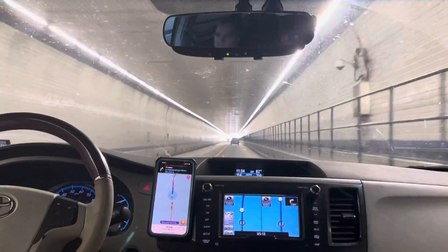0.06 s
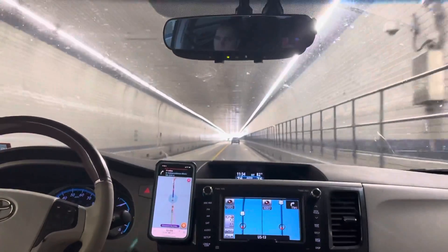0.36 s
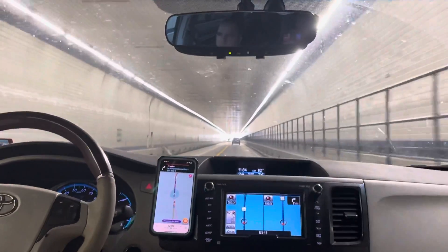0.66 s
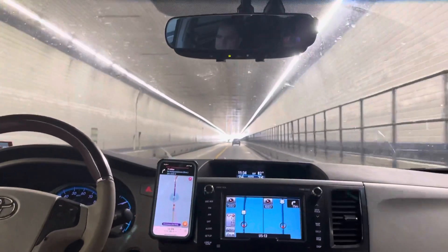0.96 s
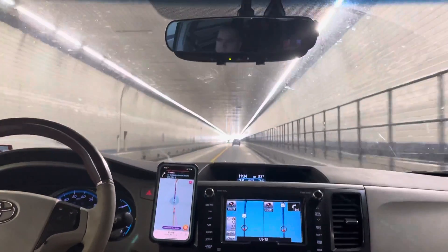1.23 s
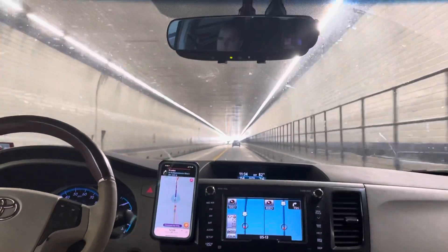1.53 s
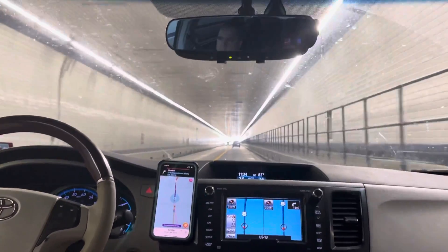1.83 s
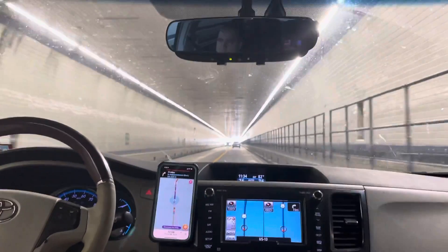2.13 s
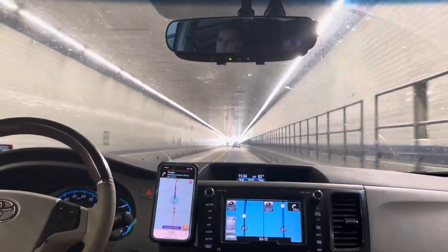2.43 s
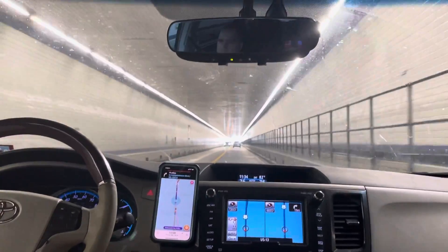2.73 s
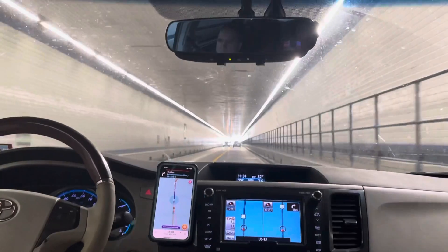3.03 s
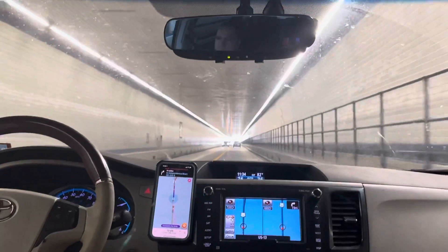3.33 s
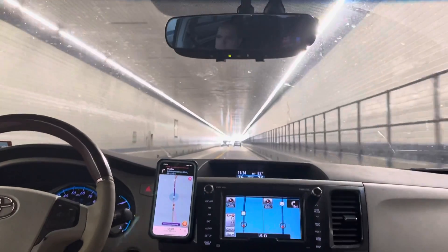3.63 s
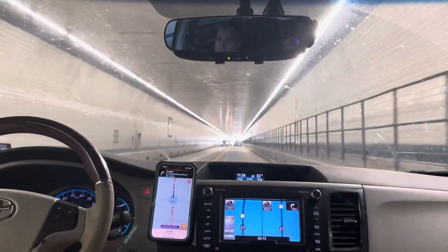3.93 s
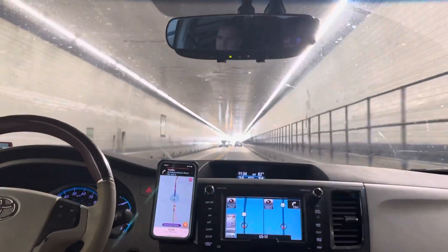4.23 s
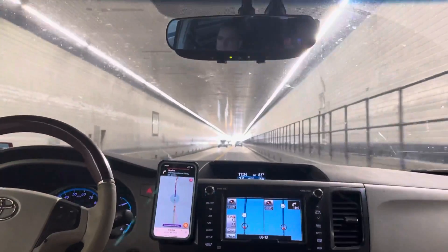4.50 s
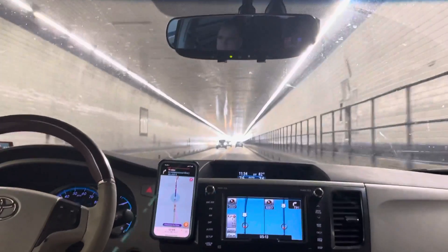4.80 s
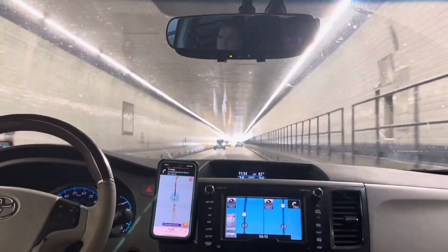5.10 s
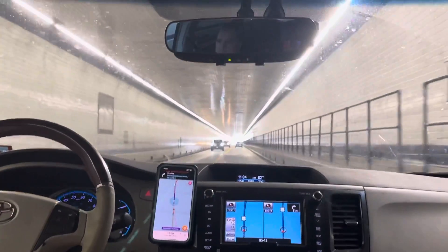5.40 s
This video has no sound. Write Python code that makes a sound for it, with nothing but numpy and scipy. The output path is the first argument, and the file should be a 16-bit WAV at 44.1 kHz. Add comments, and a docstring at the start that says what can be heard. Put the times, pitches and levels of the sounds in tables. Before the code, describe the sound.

A car cruises through a long tunnel, heard from the front seats with the windows shut. A deep, steady road rumble and a low engine drone fill the whole five and a half seconds, the pitch creeping up very slightly. Muffled tyre roar lies above them, with a faint, thin whine in the hiss. A small knock hits the microphone's holder right at the start. From about 1 second a deep cabin boom builds, reaching full strength near 2.4 seconds and holding. The rumble surges briefly several times between 1 and 1.8 seconds, and again around 4.3 and 4.7 seconds. Plastic trim gives light, short ticks at about 2.6, 3.7 and 4.9 seconds. A second, duller knock on the holder comes at about 5.3 seconds, while the rumble carries on to the end.

```python
"""Car cruising through a tunnel

Heard from inside, gathering speed very slightly. The road shakes the body into a deep rumble, the six-cylinder
engine drones, and its deepest tone swells into a boom. Tyre roar, thrown back by the tunnel walls, comes in
through the glass. A thin whine rings in the road hiss and the treble swells faintly at times. Plastic trim
ticks now and then, and two small knocks land on the microphone's holder."""
import sys
import numpy as np
from scipy import signal
from scipy.fft import rfft, irfft
from scipy.io import wavfile

SR = 44100
rng = np.random.default_rng(int(sys.argv[2]) if len(sys.argv) > 2 else 0)


def file_out(sig):
    """Save sig as 16-bit WAV at sys.argv[1]."""
    # one column per channel
    cols = np.atleast_2d(sig).T
    # limit, then scale
    lim = np.clip(cols, -1, 1)
    pcm = np.round(lim * 32767).astype(np.int16)
    wavfile.write(sys.argv[1], SR, pcm)


N = 249606


# The low bed of road noise: freq_hz, density_db
RUMBLE_SPECTRUM = [(14, -67), (26, -58.5), (34, -57), (44, -40), (64, -45), (88, -42.3), (115, -43.7),
                   (140, -47.7), (160, -51), (192, -57.5), (245, -54), (315, -62.5), (420, -61.8),
                   (600, -82)]
def road_rumble(gain_db):
    """The road shakes the car's body into a steady, deep rumble."""
    return from_db(gain_db) * cabin_noise(RUMBLE_SPECTRUM)


# The boom's slow glide and build: time_s, pitch_hz, level_db
BOOM_CURVE = [(0, 54.5, -29), (.85, 55.2, -35), (1.15, 55.5, -26), (2, 56.4, -24), (2.4, 56.8, -22.3),
              (3.6, 57.7, -22.5), (4.5, 57.8, -23.5), (5.6, 58, -24.3)]
def engine_boom(gain_db, waver):
    """A firm, deep engine tone near four times the cycle rate; it builds with speed."""
    hz, db = in_time(BOOM_CURVE)
    tone = (1 + waver * drift(6.6)) * np.cos(2 * np.pi * np.cumsum(hz) / SR)
    return np.sqrt(2) * from_db(db + gain_db) * tone * port_gains(hz.mean())


# Engine tones at their fullest, the 6th being the firing rate: cycle_multiple, level_db
ENGINE_HARMONICS = [(6, -28.8), (8, -38), (9, -37.5), (12, -31), (15, -32.5), (18, -38.5), (19, -51),
                    (20, -48), (21, -52), (24, -50.5), (27, -55), (30, -53)]
# Tones that bloom and fade: cycle_multiple, peak_s, rise_db_per_s, fall_db_per_s
ENGINE_SWELLS = [(12, 3.6, 1.1, 6.5), (15, 1.5, .3, .9), (18, 1.7, .5, 1.6)]
def engine(drone_db, overtone_db, drone_waver, overtone_waver):
    """Tones locked to the slowly quickening crankshaft, each wavering in strength and phase."""
    t = np.arange(N) / SR
    start_hz, climb_hz_per_s, left_lead_s = 13.99, .122, 0.0003
    cycle_hz = start_hz + climb_hz_per_s * t  # four-stroke cycles a second
    angle = 2 * np.pi * (np.cumsum(cycle_hz) / SR + cycle_hz * left_lead_s * np.array([[1], [0]]))
    dip_db = {k: np.maximum(rise * (peak - t), fall * (t - peak))
              for k, peak, rise, fall in ENGINE_SWELLS}
    out = 0
    for multiple, db in ENGINE_HARMONICS:
        group_db, waver = (drone_db, drone_waver) if multiple <= 15 else (overtone_db, overtone_waver)
        strength = 1 + waver * drift(2.7)
        tone = np.cos(multiple * angle + 2 * np.pi * rng.random() + waver * drift(1.5))
        level = from_db(db + group_db - dip_db.get(multiple, 0))
        out += np.sqrt(2) * level * strength * tone * port_gains(multiple * cycle_hz.mean())
    return out


# Brief, deep swells in the rumble: peak_s, level_db, pitch_hz
RUMBLE_SURGES = [(.96, -21, 82.5), (1.14, -27.5, 84.4), (1.39, -19, 83), (1.81, -19.5, 50.1),
                 (4.27, -29, 88), (4.72, -18.5, 52)]
def rumble_surges(half_length_s):
    """The rumble surges for a few deep cycles at a time."""
    out, t = 0, np.arange(N) / SR
    for s, db, hz in RUMBLE_SURGES:
        tone = np.cos(2 * np.pi * (hz * t + rng.random()))
        out += np.sqrt(2) * from_db(db) * swell(s, half_length_s) * tone * port_gains(hz)
    return out


# Tyres and air, muffled by the glass: freq_hz, density_db
ROAR_SPECTRUM = [(300, -73.5), (440, -66), (560, -66.5), (800, -68.5), (1000, -73.5), (1250, -77),
                 (1720, -76.5), (1900, -78), (2100, -82), (2600, -86), (3200, -91), (4500, -99.5),
                 (6400, -105.5), (9500, -113), (13000, -122.5)]
# Coarse patches of road: peak_s, level_db, half_length_s
COARSE_PATCHES = [(0.967, -69.5, .04), (3.668, -73, .04), (5.572, -73, .04)]
# Their midrange colour: freq_hz, gain_db
PATCH_SPECTRUM = [(250, -10.5), (700, 4.5), (1500, -9.5), (2100, -14.5)]
def tyre_roar(flutter_db):
    """Rolling tyres roar, fluttering with the surface and swelling on coarse patches."""
    surface = from_db(flutter_db * drift(18))
    coarse = sum(from_db(db) * swell(s, half_s) for s, db, half_s in COARSE_PATCHES)
    return surface * cabin_noise(ROAR_SPECTRUM) + coarse * cabin_noise(PATCH_SPECTRUM)


# The bands of a thin whine: pitch_hz, width_hz, density_db
WHINE_BANDS = [(1888, 34, -79.5), (1983, 42, -85.5), (3355, 42, -93.5)]
def thin_whine(waver_db):
    """Narrow resonances ring faintly in the road hiss, each wavering by itself."""
    out = 0
    for hz, width_hz, db in WHINE_BANDS:
        band = resonate(rng.standard_normal(N), hz, width_hz) * np.sqrt(SR / 2)
        out += from_db(db + waver_db * drift(2.7)) * band * port_gains(hz)
    return out


# Plastic ticks: start_s, level_db, ring_s, place (0 = first contact spot, 1 = second), snap_db
TRIM_TICKS = [(2.5653, -40, .05, 0.0, 11), (2.5709, -31, 0.056, 0.0, 9), (3.7490, -40, 0.058, 0.092, 15),
              (3.7547, -33, 0.058, 0.0, 13), (4.9375, -34, 0.075, 1.0, 18.5)]
# The trim's ring from each spot: pitch_hz, width_hz, first_spot_db, second_spot_db
TRIM_MODES = [(1450, 110, 7, 1), (1920, 50, 11.5, 6.5), (2347, 120, 5.5, 6.5), (2870, 290, 0, 5.5),
              (3230, 310, -3, 5.5), (3780, 240, 3.5, -1), (4240, 240, -8, 4.5), (4600, 140, -11, 0.5),
              (5140, 180, -1, -4), (5450, 150, -1.5, -6), (5840, 200, -4.5, -9), (6360, 320, -6.5, 3.5),
              (6780, 220, -14, -5.5), (7300, 320, -20, -5.5), (8900, 180, -2, -10), (9150, 220, 0.5, -1.5),
              (11700, 500, -30, -18), (13000, 900, -35, -20)]
def trim_ticks(scatter_db, ring_db, contact_hz):
    """A snap, a thin ring and dense cabin reflections; the contact place sets each mode's strength."""
    out, t = np.zeros(N), np.arange(N) / SR
    for s, db, ring_s, place, snap_db in TRIM_TICKS:
        tail = decay(s, ring_s)
        force = from_db(scatter_db) * tail * rng.standard_normal(N)
        force[round(s * SR)] += from_db(snap_db)
        for k, (hz, width_hz, first_db, second_db) in enumerate(TRIM_MODES):
            mode_db = np.interp(place, [0, 1], [first_db, second_db])
            ring = from_db(ring_db) * tail * np.sin(2 * np.pi * hz * (t - s))
            out += (-1) ** k * from_db(db + mode_db) * (resonate(force, hz, width_hz) + ring)
    # plastic on plastic is too soft to excite the very top
    return signal.sosfilt(signal.butter(4, contact_hz, fs=SR, output="sos"), out)


# Small knocks on the microphone's holder: start_s, level_db, cutoff_hz
HOLDER_KNOCKS = [(0.0637, -18, 1200), (5.276, -21, 480)]
# The holder's ring: pitch_hz, ring_s, level_db, right_gain (negative: rocking opposes the two ports)
HOLDER_MODES = [(73, .34, 0, -1.5), (245, .08, 2, -1.2), (410, .03, -2, -1.2), (540, 0.0086, -5, 0.93),
                (787, 0.014, 0, 0.84), (1150, .004, 3, 0.37)]
def holder_knocks():
    """Each knock sets the holder ringing; a softer contact dulls the high modes."""
    out = 0
    for s, knock_db, cutoff_hz in HOLDER_KNOCKS:
        ring, age = 0, np.arange(N) / SR - s
        for hz, ring_s, db, right_gain in HOLDER_MODES:
            mode = from_db(knock_db + db) * decay(s, ring_s) * np.sin(2 * np.pi * hz * age)
            ring += mode * np.array([[1], [right_gain]])
        out += signal.sosfilt(signal.butter(2, cutoff_hz, fs=SR, output="sos"), ring)
    return out


# Faint swells of high hiss: peak_s, level_db, half_length_s
HISS_SWELLS = [(0.2845, -97, 0.002), (1.023, -107, 0.039), (1.31, -111.5, .025), (1.55, -112.5, 0.026),
               (3.457, -117, 0.39)]
# Their bright colour: freq_hz, gain_db
HISS_SPECTRUM = [(1500, -22), (4000, 7.5), (7000, 0), (10000, -2.5), (13000, -5)]
def hiss_swells():
    """High hiss swells faintly and fades."""
    envelope = sum(from_db(db) * swell(s, half_s) for s, db, half_s in HISS_SWELLS)
    return envelope * cabin_noise(HISS_SPECTRUM)


# Stereo width of the cabin's diffuse sound: freq_hz, correlation (1 = mono)
CABIN_CORRELATION = [(50, 0.95), (75, 0.91), (145, 0.76), (270, 0.84), (360, 0.5), (480, 0.6),
                     (720, 0.0062), (980, 0.46), (1300, 0.15), (1600, -.12), (1800, -0.3), (2000, 0.77),
                     (2800, 1), (6000, 1)]
def cabin_noise(spectrum):
    """Stereo noise of the given spectrum, nearly mono in the bass, where the waves are long."""
    hz = np.fft.rfftfreq(N, 1 / SR)
    mid, side = rfft(rng.standard_normal((2, N)))
    alike = at_hz(CABIN_CORRELATION, hz)
    ports = np.sqrt(1 + alike) * mid + np.sqrt(1 - alike) * side * [[1], [-1]]
    top_hz = spectrum[-1][0]
    colour = from_db(at_hz(spectrum, hz)) / np.maximum(hz / top_hz, 1) ** 10
    return irfft(ports * port_gains(hz) * colour, N) * np.sqrt(SR) / 2


# How the cabin's sound leans: freq_hz, left_minus_right_db
CABIN_BALANCE = [(60, -1.8), (140, -1.2), (220, -2.6), (330, -1.6), (520, -2.0), (900, -1.7), (1500, .8),
                 (1800, 5.6), (2300, 2.6), (3100, 0)]
def port_gains(hz):
    """Gain of the cabin's sound field at the microphone's left and right ports."""
    return from_db(at_hz(CABIN_BALANCE, hz) * np.array([[.5], [-.5]]))


def from_db(db):
    """Decibels to gain."""
    return 10 ** (np.asarray(db) / 20)


def in_time(rows):
    """The columns of a curve, one value a sample."""
    s, *columns = np.transpose(rows)
    return [np.interp(np.arange(N) / SR, s, c) for c in columns]


def at_hz(points, hz):
    """Read a table on a log-frequency axis."""
    known, values = np.transpose(points)
    return np.interp(np.log(np.maximum(hz, 1)), np.log(known), values)


def drift(rate_hz):
    """A random wander with spread 1, mostly slower than rate_hz."""
    hz = np.fft.rfftfreq(N, 1 / SR)
    slow = irfft(rfft(rng.standard_normal(N)) / (1 + (hz / rate_hz) ** 2), N)
    return slow / slow.std()


def resonate(x, hz, width_hz):
    """A two-pole resonance with gain 1 at its peak."""
    r = np.exp(-np.pi * width_hz / SR)
    feedback = [1, -2 * r * np.cos(2 * np.pi * hz / SR), r * r]
    return signal.lfilter(np.array([1, 0, -1]) * (1 - r * r) / 2, feedback, x)


def decay(start_s, ring_s):
    """An envelope that jumps to 1 and falls 60 dB in ring_s."""
    age = np.arange(N) / SR - start_s
    return (age >= 0) * from_db(-60 * np.clip(age / ring_s, 0, 4))


def swell(peak_s, half_length_s):
    """A smooth rise to 1 and back."""
    return np.exp(-((np.arange(N) / SR - peak_s) / half_length_s) ** 2)


def scene():
    """Everything as heard from the front seats."""
    drone = engine(drone_db=0.03, overtone_db=-0.5, drone_waver=.11, overtone_waver=.35)
    boom = engine_boom(gain_db=0.24, waver=0.076)
    ticks = trim_ticks(scatter_db=-1.0, ring_db=-18, contact_hz=12500)
    details = ticks + holder_knocks() + hiss_swells()
    road = road_rumble(gain_db=0.4) + tyre_roar(flutter_db=.5) + rumble_surges(half_length_s=0.042)
    return road + boom + drone + thin_whine(waver_db=2.5) + details


# How far the left port trails the right in the treble: freq_hz, lag_cycles
LEFT_PORT_LAG = [(6000, 0), (7000, .11), (7500, .25), (8000, .48), (8500, .53), (9200, .67), (10100, .8),
                 (10500, 1)]
def record(dry):
    """The two ports fall out of phase in one treble band; the sound ends softly and the top is cut."""
    lag_cycles = at_hz(LEFT_PORT_LAG, np.fft.rfftfreq(2 * N, 1 / SR))
    left = irfft(rfft(dry[0], 2 * N) * np.exp(-2j * np.pi * lag_cycles))[:N]
    fade_s, cutoff_hz = .004, 13700
    fade = np.minimum(np.arange(N)[::-1] / SR / fade_s, 1)
    top_cut = signal.ellip(10, .1, 80, cutoff_hz, fs=SR, output="sos")
    return signal.sosfilt(top_cut, np.array([left, dry[1]]) * fade)


dry = scene()
out = record(dry)
file_out(out)
```